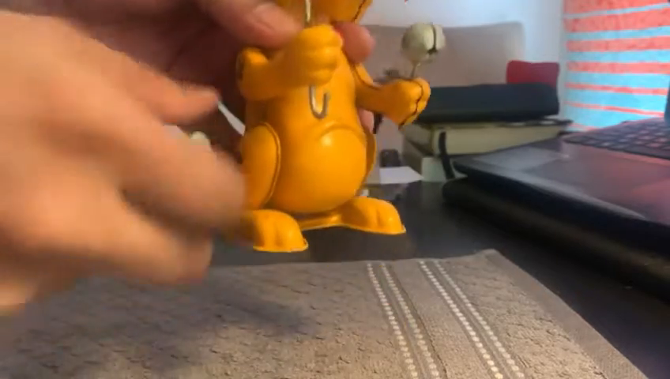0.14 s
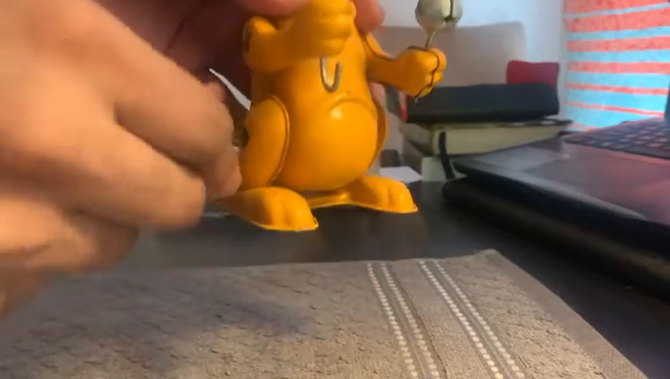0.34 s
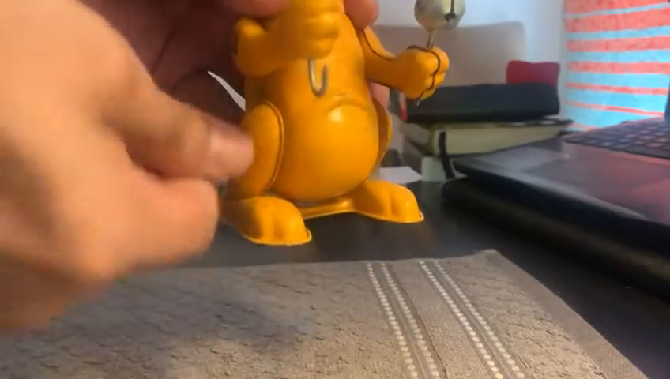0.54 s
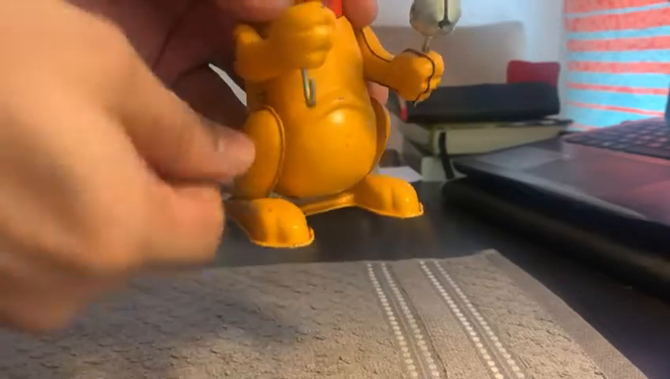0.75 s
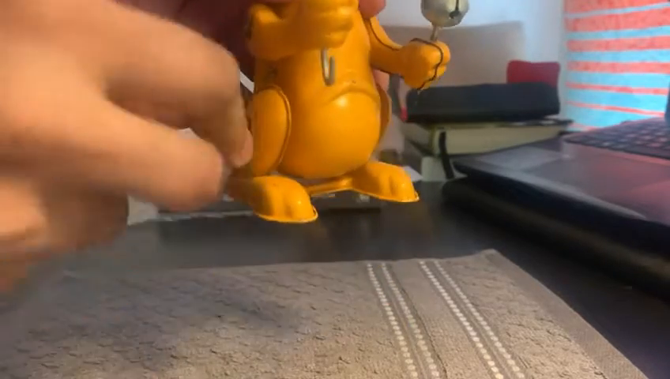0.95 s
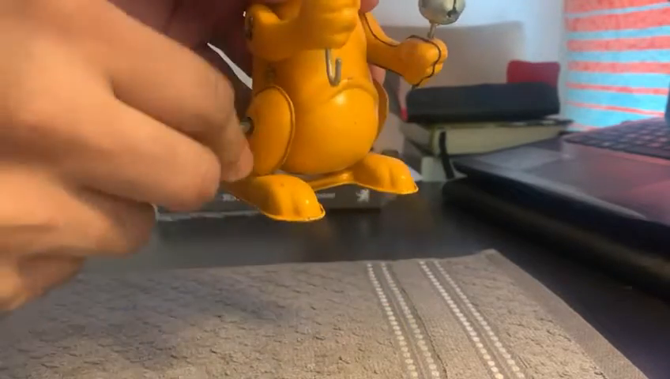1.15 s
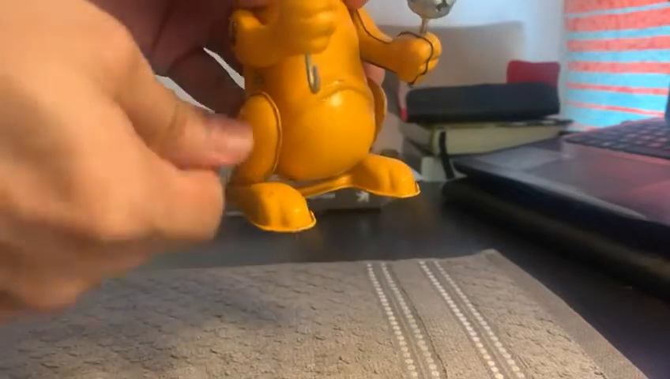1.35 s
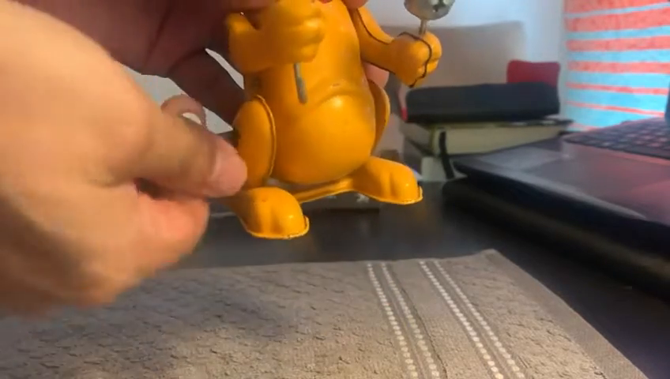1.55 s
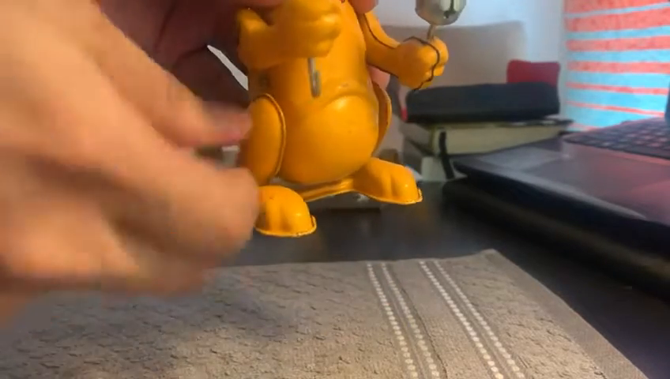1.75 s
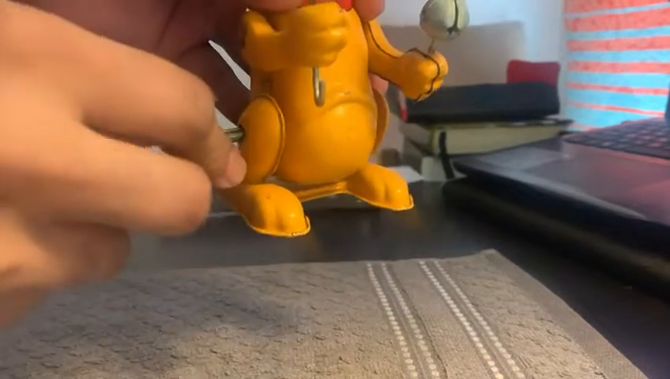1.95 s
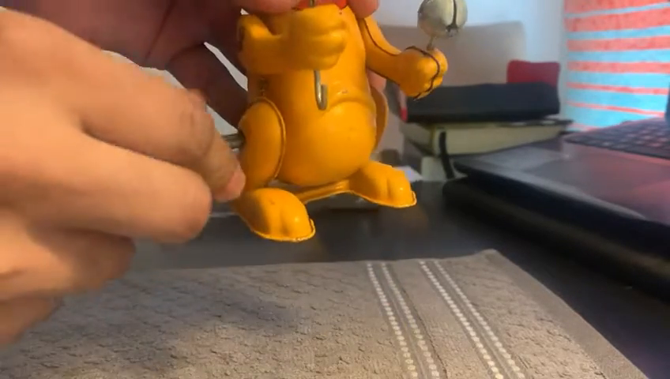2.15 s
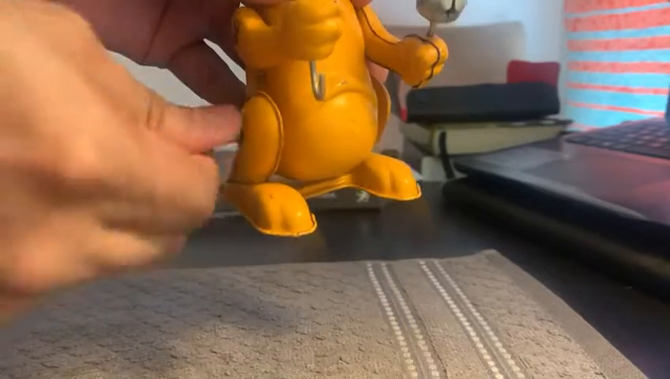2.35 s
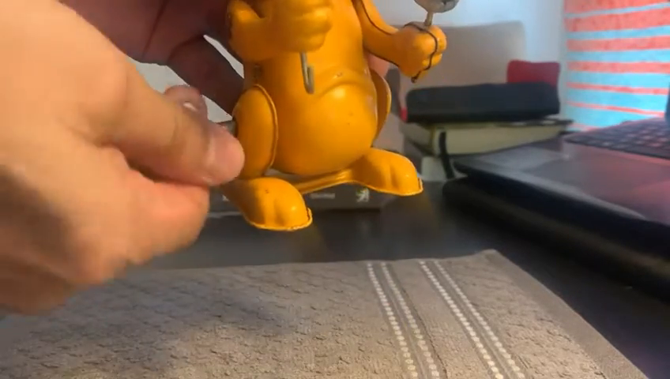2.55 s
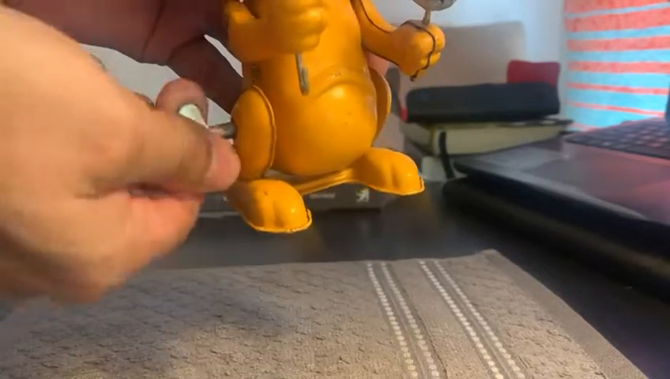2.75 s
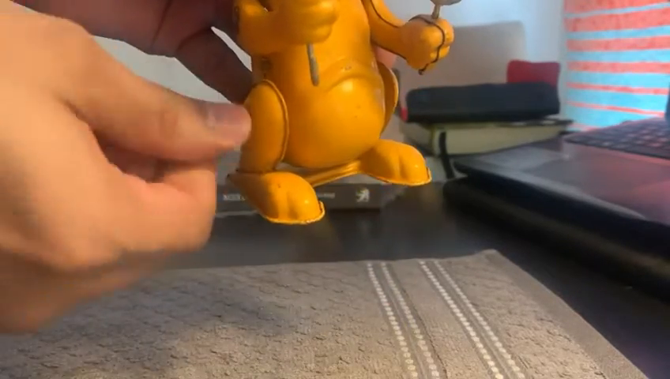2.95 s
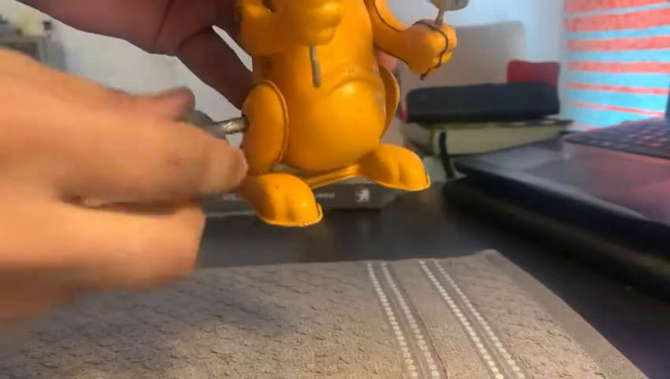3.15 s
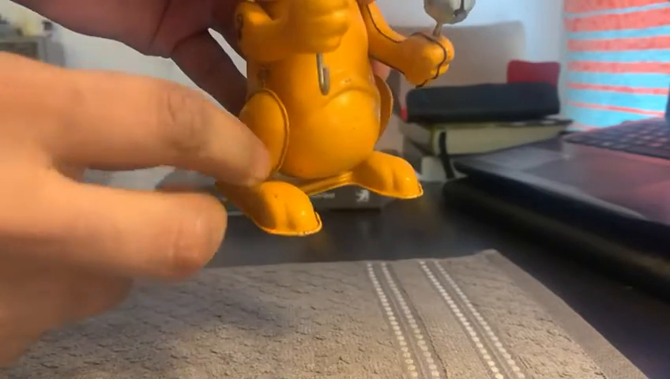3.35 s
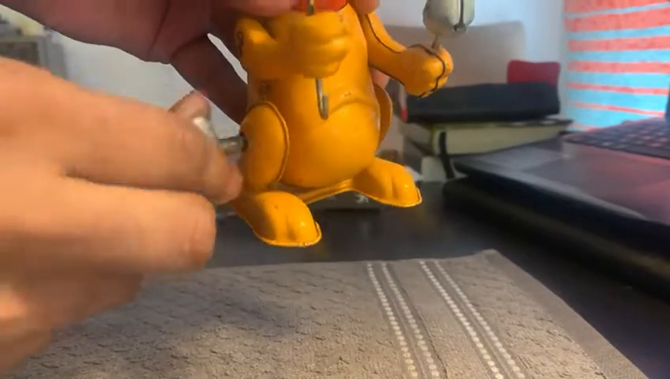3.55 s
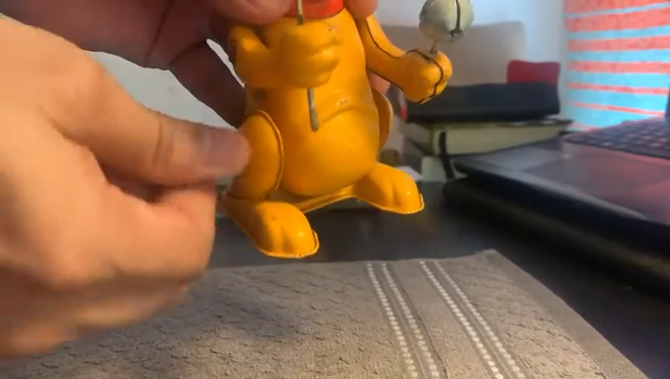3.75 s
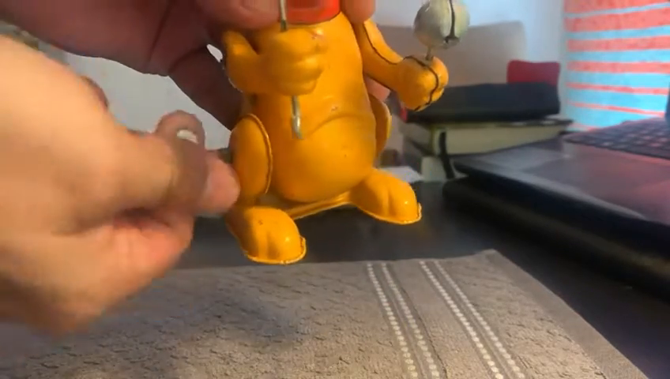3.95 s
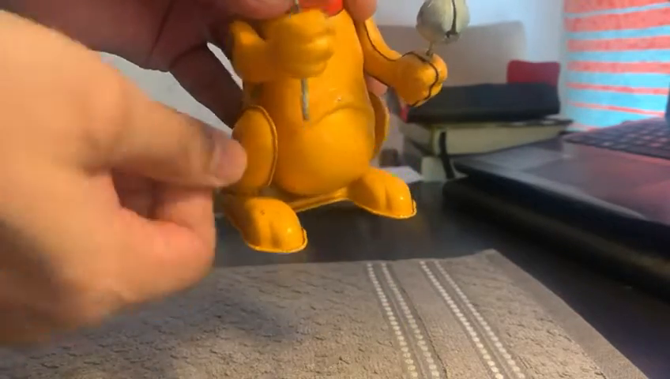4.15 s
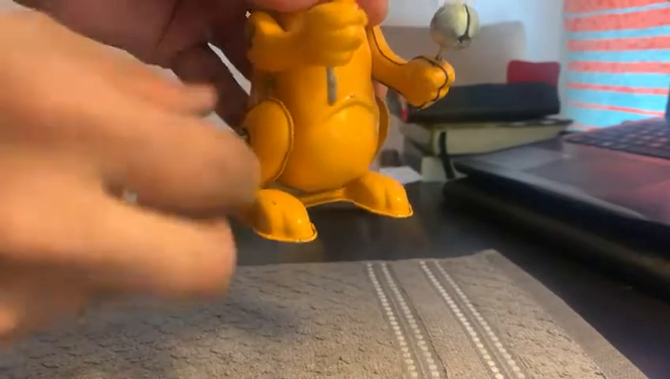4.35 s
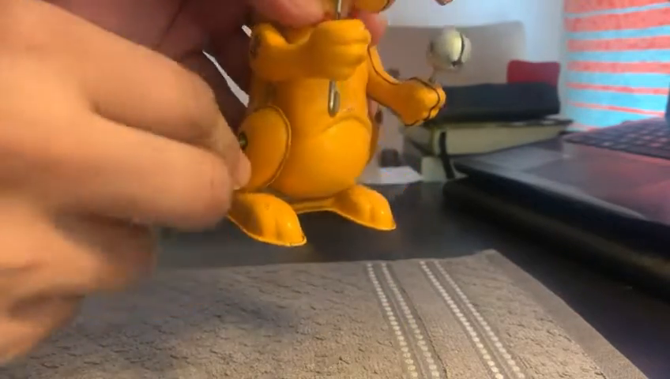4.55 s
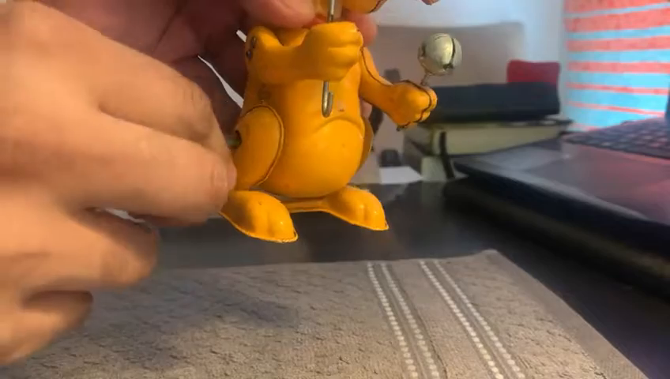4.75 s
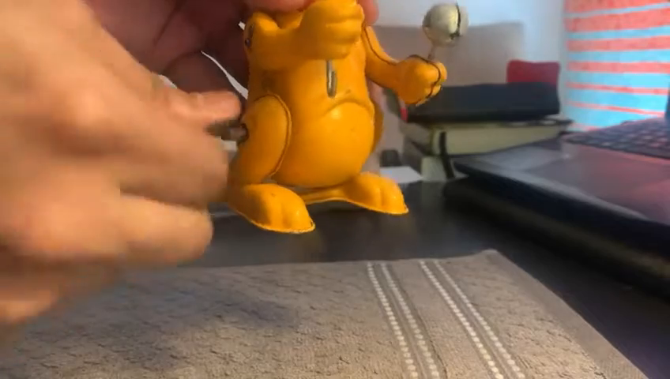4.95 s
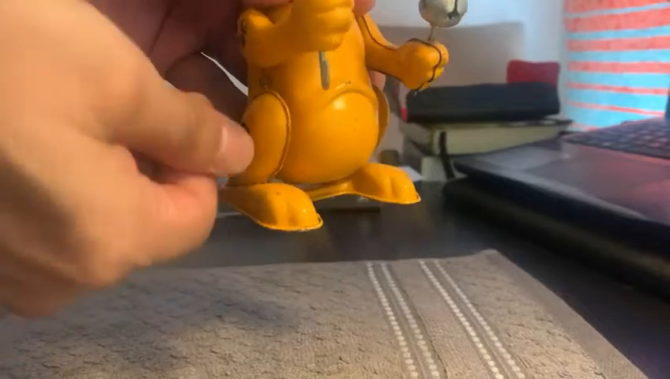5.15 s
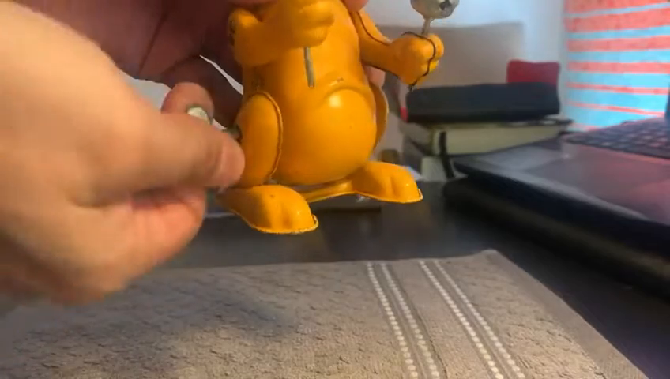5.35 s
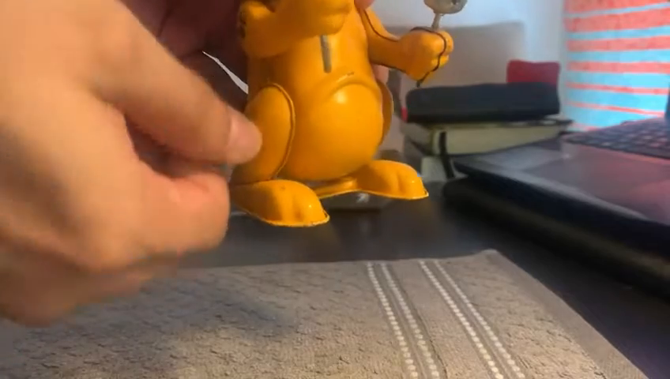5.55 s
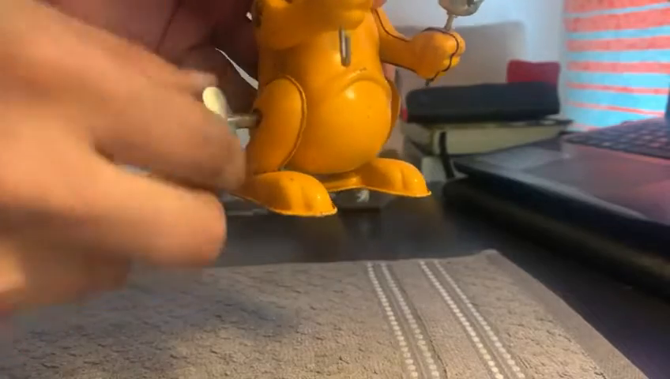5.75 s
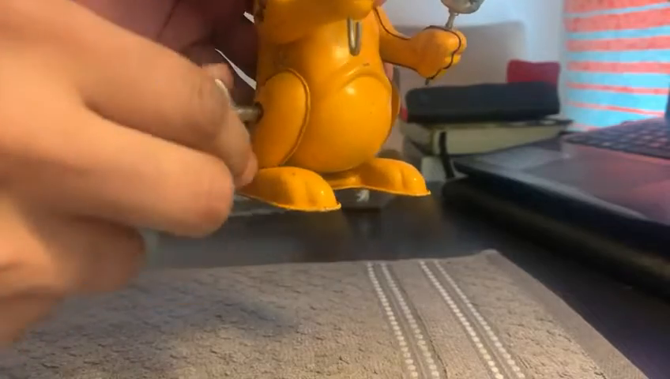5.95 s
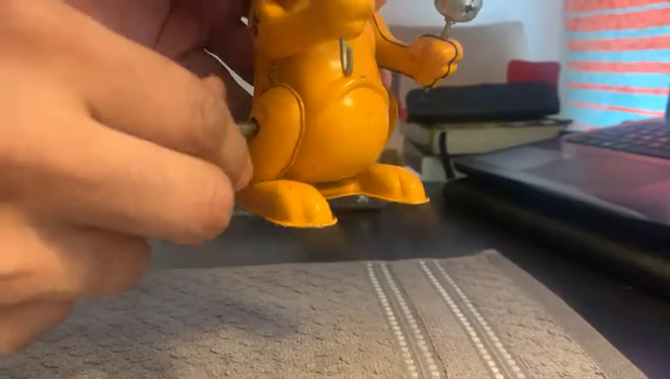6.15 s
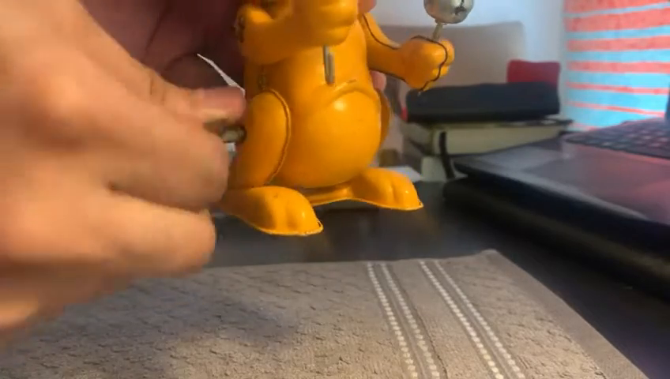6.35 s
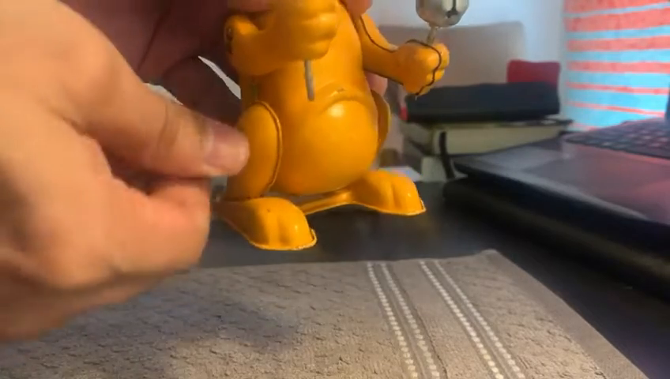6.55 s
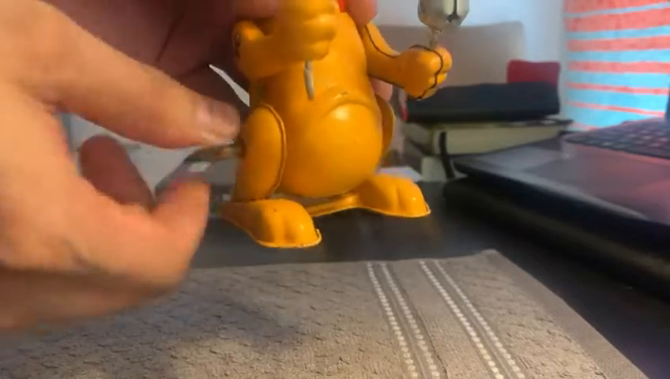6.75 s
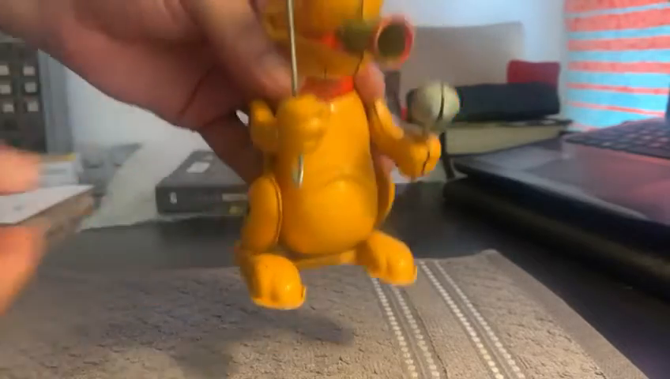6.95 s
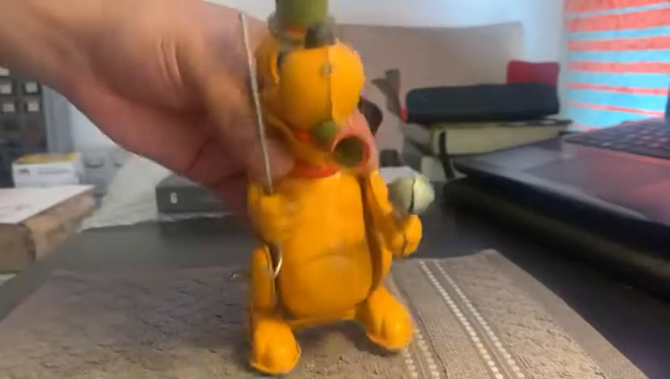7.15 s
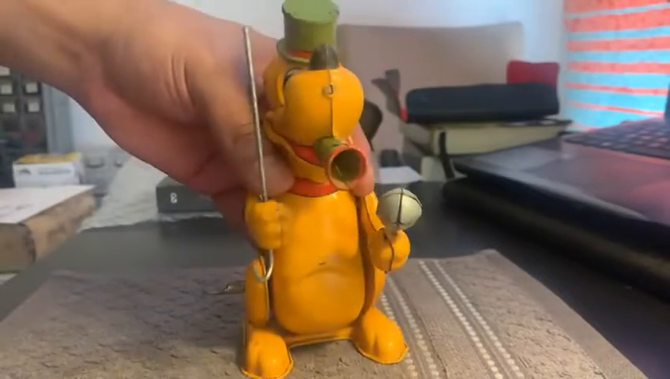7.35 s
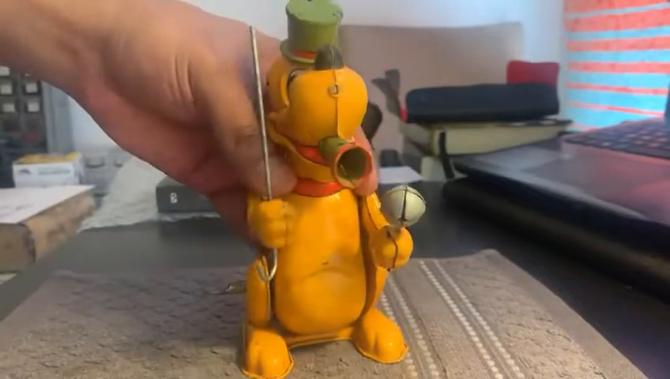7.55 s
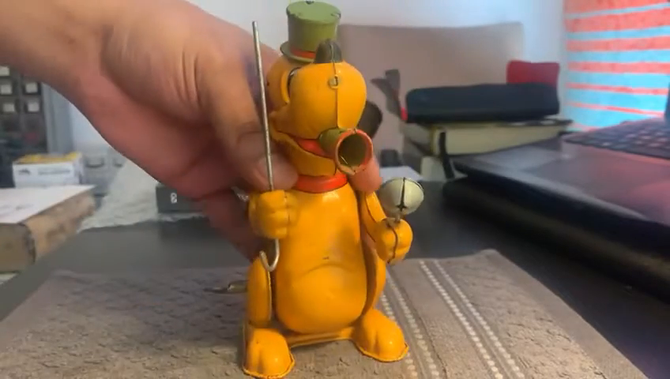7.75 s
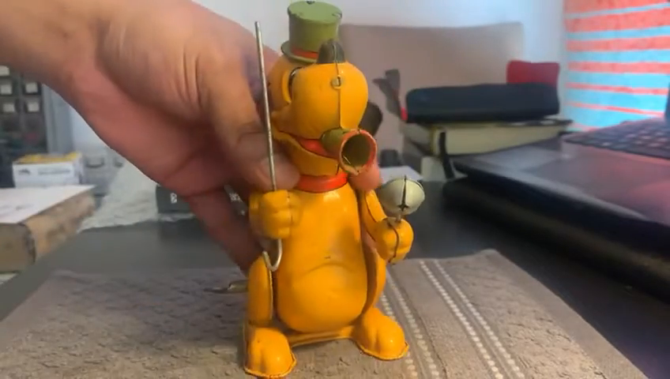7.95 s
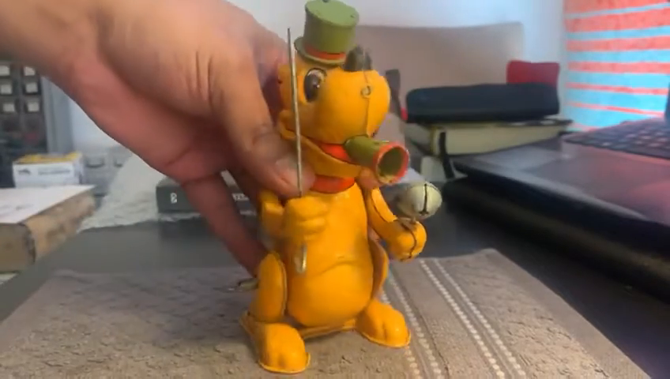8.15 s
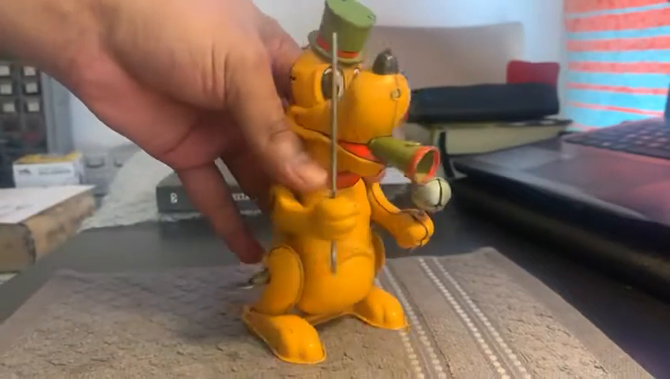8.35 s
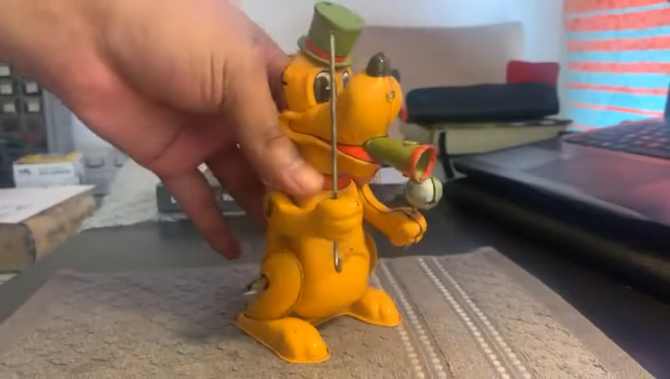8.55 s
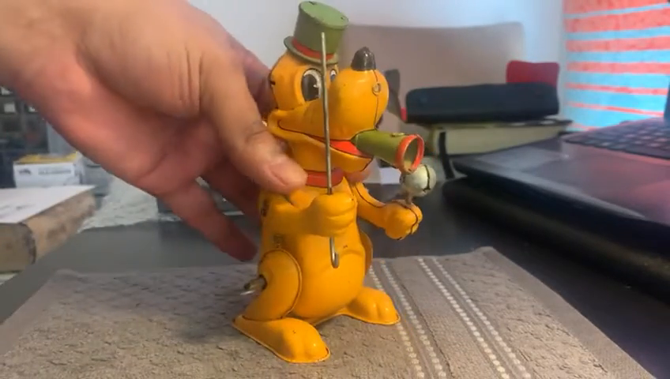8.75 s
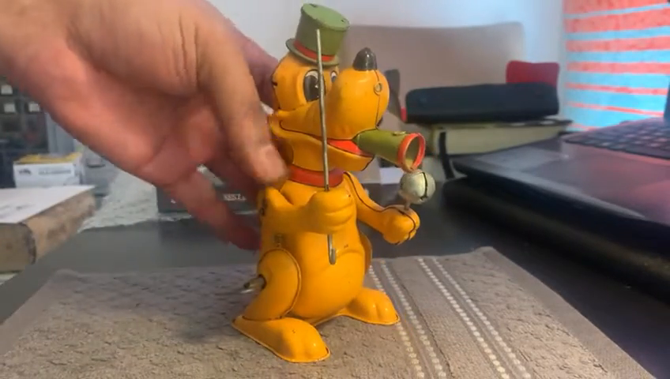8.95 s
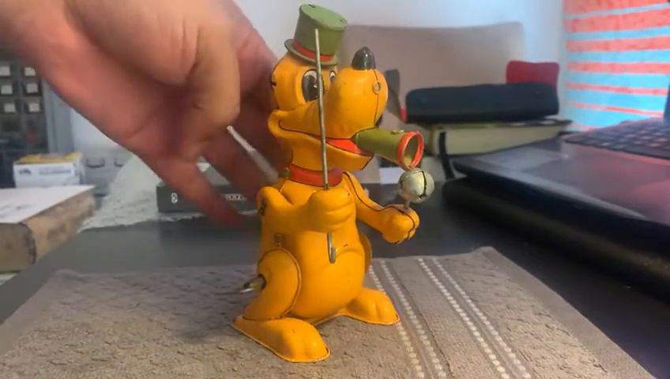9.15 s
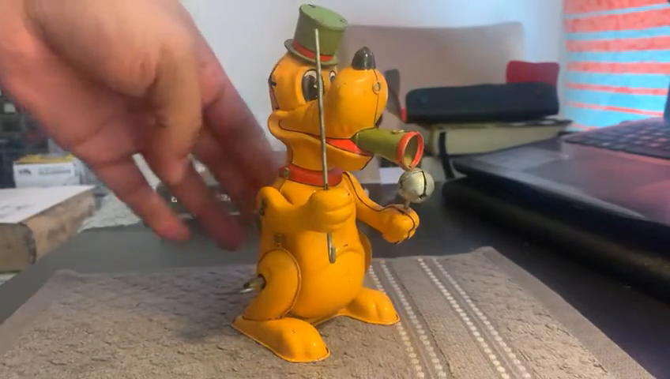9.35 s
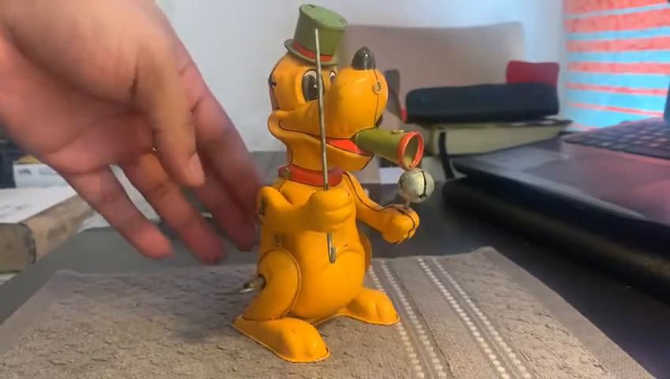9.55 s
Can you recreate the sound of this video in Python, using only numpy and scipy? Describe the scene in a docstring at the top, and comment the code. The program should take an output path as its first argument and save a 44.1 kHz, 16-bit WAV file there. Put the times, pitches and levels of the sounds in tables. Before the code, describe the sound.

Close, crisp key rattles and ratchet snaps in short runs in a quiet humming room, ending with soft cloth scrapes, a thump and a faint bell.

```python
"""Clockwork tin toy

A tin clockwork toy is wound by hand just above a desk, close to two microphones, in a quiet room with a hum.
On each turn the loose key rattles and the pawl drops over the ratchet teeth; the hollow tin shell rings briefly.
Then its feet drag over a cloth mat and, as it is let go, its little bell tinkles.
Hits are noise bursts and decaying modes; rubbing, air and rumble are coloured noise; the hum is sines."""
import sys
import numpy as np
from scipy import signal
from scipy.fft import rfft, irfft, next_fast_len
from scipy.io import wavfile
from scipy.ndimage import map_coordinates

SR = 44100
rng = np.random.default_rng(int(sys.argv[2]) if len(sys.argv) > 2 else 0)


def bounce(signal):
    """Save signal as a 16-bit WAV file at the path given by the first command-line argument."""
    frames = np.transpose(np.atleast_2d(signal))
    limited = np.clip(frames, -1, 1)
    pcm = np.round(limited * 32767).astype(np.int16)
    wavfile.write(sys.argv[1], SR, pcm)


N = 423798  # length [samples]

# Levels in the tables are set before each layer's own trim (the *_db settings).


def amp(db):
    """Decibels to linear gain."""
    return 10 ** (np.asarray(db) / 20)


def unit(x):
    """Scale to rms 1."""
    return x / np.sqrt(np.mean(x ** 2) + 1e-20)


def along(points, hz):
    """Read a curve of (frequency [Hz], value) points on a log frequency axis."""
    f, v = np.transpose(points)
    return np.interp(np.log(hz + 1), np.log(f + 1), v)


def wobble(rate, size=N):
    """A smooth random curve with rate knots a second."""
    knots = rng.standard_normal(int(N * rate / SR) + 4)
    return map_coordinates(knots, [np.arange(size) * rate / SR])


def filtered(x, response):
    """Filter x by a complex response of frequency."""
    size = next_fast_len(N + SR // 2)
    return irfft(rfft(x, size) * response(np.fft.rfftfreq(size, 1 / SR)), size)[..., :N]


def noise(colour):
    """Coloured noise of rms 1."""
    return unit(filtered(rng.standard_normal(N), lambda hz: amp(along(colour, hz))))


def impulse(colour, size=1024):
    """Minimum-phase impulse response with this colour, by folding the cepstrum."""
    cepstrum = irfft(np.log(amp(along(colour, np.fft.rfftfreq(size, 1 / SR)))))
    cepstrum[1:size // 2] *= 2
    cepstrum[size // 2 + 1:] = 0
    return irfft(np.exp(rfft(cepstrum)))


def varied(colour, spread_db):
    """Every contact lands on another spot and so takes a colour of its own."""
    return impulse(colour + rng.standard_normal((len(colour), 1)) * [0, spread_db])


def struck(x):
    """Scale a stereo hit to rms 1 over its first 5 ms."""
    return x / np.sqrt(np.mean(x[:, :SR // 200] ** 2) + 1e-20)


def burst(response, rise, t60, apart):
    """A crowd of short-lived modes: coloured noise that swells and dies, partly different at each port."""
    t = np.arange(SR // 12) / SR
    shape = (1 - np.exp(-t / rise)) * np.exp(-np.log(1000) * t / t60)
    hiss = rng.standard_normal(len(t)) + apart * rng.standard_normal((2, len(t)))
    return struck(signal.fftconvolve(shape * hiss, response[None], axes=1))


def ring(modes, scatter_db, detune):
    """Decaying modes, at new strengths for each blow; grip and loose joints detune them and blur their pitch."""
    t = np.arange(int(SR * max(m[2] for m in modes))) / SR
    hz, db, t60 = np.transpose(modes)[:, :, None]
    size, shift, phase = rng.standard_normal((3, len(modes), 1))
    ports = .6 * rng.standard_normal((2, len(modes), 1))  # phase offset at each port [rad]
    blur = np.cumsum(rng.standard_normal((len(modes), len(t))), axis=1) * detune
    waves = np.sin(2 * np.pi * (hz * (1 + detune * shift) * t + phase + blur) + ports)
    decay = np.exp(-np.log(1000) * t / t60)
    return struck(np.sum(amp(db + scatter_db * size) * decay * waves, axis=1))


def add(track, s, sound):
    """Mix a stereo sound in at time s."""
    part = track[:, max(round(s * SR), 0):][:, :sound.shape[1]]
    part += sound[:, :part.shape[1]]


# colour of the room air: (frequency [Hz], level [dB per Hz])
AIR = [(20, -12.5), (40, 1), (60, 7), (85, -0.5), (130, 0), (250, -3.5), (400, -12.5), (750, -14.5),
       (1100, -22), (2500, -33), (7500, -42.5), (13000, -51.5)]
# left-right likeness of the air: (frequency [Hz], correlation [-1 to 1])
ALIKE = [(125, 0.83), (300, 0.46), (800, 0.03), (3000, 0.03)]
# partials of an appliance hum, before wavering: (frequency [Hz], level [dB])
HUM = [(123.6, -66), (247.2, -69.5), (370.8, -78)]


def background():
    """Wide, low room air and a slightly unsteady hum of sines, a little louder on the right."""
    turn = lambda hz: np.arccos(np.clip(along(ALIKE, hz), -1, 1)) / 2
    mid = filtered(noise(AIR), lambda hz: np.cos(turn(hz)))
    side = filtered(noise(AIR), lambda hz: np.sin(turn(hz)))
    air = amp(-61.0) * np.array([mid + side, mid - side])
    t = np.arange(N) / SR
    hum = np.zeros(N)
    for hz, db in HUM:
        level = amp(db + 2.4 * wobble(8.2)) * np.sqrt(2)
        hum += level * np.sin(2 * np.pi * hz * t + 0.6 * wobble(7))
    return (air + hum) * amp([[-.6], [.6]])


# decay of the room: (frequency [Hz], t60 [s])
ROOM = [(200, 0.71), (1500, 0.2), (3000, 0.23), (7000, 0.19)]


def room(x, count=8):
    """A small room answers with decaying noise tails, a new one per block as the toy moves in the hand."""
    out = np.zeros((2, N + SR))
    block = N // count + 1
    for start in range(0, N, block):
        hz, t, z = signal.stft(rng.standard_normal((2, SR // 2)), SR, nperseg=256)
        decay = np.exp(-np.log(1000) * t / along(ROOM, hz)[:, None])
        tail = signal.istft(z * decay, SR, nperseg=256)[1]
        tail *= 1 - np.exp(-np.arange(tail.shape[1]) / SR / 0.0013)  # soft onset
        tail /= np.linalg.norm(tail[0])
        source = x[:, start:start + block].mean(axis=0, keepdims=True)
        wet = signal.fftconvolve(source, tail, axes=1)
        out[:, start:start + wet.shape[1]] += wet
    colour = [(500, -2.5), (2500, -3.0), (7600, -6.0), (9600, -18.5)]
    return filtered(out[:, :N], lambda hz: amp(along(colour, hz)))


# colour of the hands on the hollow body: (frequency [Hz], level [dB per Hz])
HANDLING = [(90, -10.5), (200, 6.5), (400, -1.5), (780, -7.5), (1200, -42)]
HANDLING_DB, HANDLING_EASE_DB_PER_S = -66, 2.7  # starting level of the rumble and its steady fall


def handling():
    """A low, wavering rumble of the hands shifting on the toy, ever gentler."""
    rumble = unit(noise(HANDLING) * amp(4 * wobble(9)))
    return amp(HANDLING_DB - HANDLING_EASE_DB_PER_S * np.arange(N) / SR) * rumble


def slides(table, colour, catch_db):
    """Each slide swells and fades with a colour of its own, catching and slipping in fine grains."""
    out = np.zeros((2, N))
    for s, length, db in table:
        n = int(length * SR)
        catching = amp(2 * wobble(300, n) + catch_db * wobble(35, n))
        grains = rng.standard_normal(n) * catching
        rub = unit(signal.fftconvolve(grains, varied(colour, spread_db=2))[:n])
        add(out, s, amp(db) * np.hanning(n) * np.array([rub, rub]))
    return out


# the feet slide over the mat: (start [s], length [s], level [dB])
PUSHES = [(8.0, 0.31, -72), (8.23, 0.31, -67.5)]
# colour of the feet dragging on cloth: (frequency [Hz], level [dB per Hz])
CLOTH = [(300, -4), (1100, -3), (3500, -5.5), (7400, -3.5), (8800, -14.5)]
# resonances of the body as its feet drag: (frequency [Hz], width [Hz], level [dB])
DRAG = [(2490, 39, 10), (3280, 57, 18), (4890, 230, 4)]


def dragging_feet():
    """Tin feet drag on cloth: grainy noise, coloured by band-pass resonances of the body."""
    def body(f):
        gain = 1
        for hz, width, db in DRAG:
            gain = gain + amp(db) * 1j * f * width / (hz * hz - f * f + 1j * f * width)
        return gain
    return filtered(slides(PUSHES, CLOTH, catch_db=4.5), body)


# the feet settle on the mat: (time [s], level [dB])
FEET = [(7.725, -61), (8.926, -48.5), (8.944, -58)]
# colour of the desk beneath: (frequency [Hz], level [dB per Hz])
DESK = [(30, -10), (60, 13.5), (130, -1), (400, -8.5), (1600, -16), (6000, -45)]


def foot_thumps():
    """The feet thump softly on the desk: slow-rising dull bursts."""
    out, desk = np.zeros((2, N)), impulse(DESK)
    for s, db in FEET:
        add(out, s, amp(db) * burst(desk, rise=0.0032, t60=0.084, apart=0.25))
    return out


# the pellet strikes the bell: (time [s], level [dB])
PELLET = [(8.928, -52.5), (8.945, -55.5), (8.981, -55)]
# modes of the bell: (frequency [Hz], level [dB], t60 [s])
BELL = [(6530, -2, 0.076), (7140, -8, 0.18), (11800, 2, 0.12), (11900, -3, 0.13)]


def bell():
    """The bell in the toy's hand tinkles as the fingers let go: quick strikes on high decaying modes."""
    out = np.zeros((2, N))
    for s, db in PELLET:
        add(out, s, amp(db) * ring(BELL, scatter_db=2, detune=.01))
    return out


# strokes of the fingers on the key: (start [s], length [s], scrape level [dB], chatter level [dB])
TURNS = [(0, 0.096, -55, -55), (0.437, 0.19, -57, -49.5), (0.775, 0.15, -55, -49.5),
         (1.227, .17, -55.5, -48), (2.25, 0.29, -57, -51.5), (2.93, 0.095, -61, -61),
         (3.649, .25, -59, -53.5), (4.79, .34, -61, -55), (6.33, 0.18, -66, -58)]
ATTACK_S, RELEASE_DB_PER_S = 0.066, 170  # a stroke takes hold, then eases off
GRIP_DB, GRIP_END_S = -77, 6.7  # light rubbing between strokes, until the toy is stood on the mat


def effort():
    """How hard the fingers work the key [dB]: each stroke rises, holds and eases back to a light grip."""
    t = np.arange(N) / SR
    held = lambda end: amp(-RELEASE_DB_PER_S * np.maximum(t - end, 0))
    total = amp(GRIP_DB) * held(GRIP_END_S)
    for s, length, db, _ in TURNS:
        total += amp(db) * np.clip((t - s) / ATTACK_S, 0, 1) * held(s + length)
    return 20 * np.log10(total + 1e-9)


# the fingers slide round the key to a new grip: (start [s], length [s], level [dB])
RUBS = [(.15, 0.85, -62.5), (1.95, 0.51, -63.5), (3.25, 0.51, -66)]
# colour of scraping and rubbing: (frequency [Hz], level [dB per Hz])
SCRAPE_COLOUR = [(200, -20), (750, -4), (2700, 5), (3500, -10.5), (7500, -16), (9500, -40.5)]


def finger_rubs():
    """Fingers slide on the key, catching and slipping strongly."""
    return slides(RUBS, SCRAPE_COLOUR, catch_db=12.5)


def scraping():
    """Gritty scraping of the winding: uneven coloured noise that follows the effort."""
    grit = unit(noise(SCRAPE_COLOUR) * amp(5.5 * wobble(160)))
    return amp(effort() - 1.0) * grit


# the fingers find the key again between strokes: (time [s], level [dB])
TOUCHES = [(1.664, -40), (1.862, -52.5), (1.973, -49), (2.8913, -46), (3.023, -42), (3.048, -45),
           (3.108, -48.5), (3.3423, -50), (5.672, -48.5), (5.8181, -56.5), (6.498, -53.5), (6.697, -45.5)]
# modes of the lightly touched key: (frequency [Hz], level [dB], t60 [s])
TICK = [(2130, -5.5, 0.035), (2674, 2, .05)]


def touches(touch_db=-7):
    """A fingertip brushes the key: a soft tick with a brief pitch."""
    out = np.zeros((2, N))
    for s, db in TOUCHES:
        add(out, s, amp(db + touch_db) * ring(TICK, scatter_db=3, detune=.015))
    return out


TICK_DB, TICK_CROWDING = -3, .55  # faintest tick against the effort; dB of tick rate per dB of effort


def ticks(count=190):
    """Light ticks of the key, denser and stronger the harder it is worked."""
    out, effort_db = np.zeros((2, N)), effort()
    crowding = np.cumsum(amp(TICK_CROWDING * effort_db))
    for place, size in rng.random((count, 2)):
        at = np.searchsorted(crowding, place * crowding[-1])
        db = effort_db[at] + TICK_DB + 10 * size ** 2
        add(out, at / SR, amp(db) * ring(TICK, scatter_db=5, detune=.03))
    return out


# the works slam across their play and jolt the whole body: (time [s], shell level [dB], snap level [dB],
# panel pitch [Hz], hollow level [dB], lead-in [s], first catch [dB re blow], rebound [dB re blow])
CLUNKS = [(0.834, -28, -20.5, 1830, -42.5, 0.018, -6, -17),
          (2.308, -32.5, -29, 3000, -46, 0.0079, -22, -25.5),
          (2.973, -26, -24.5, 2828, -45.5, 0.035, -2.5, -8),
          (3.687, -31.5, -38, 2023, -50, .025, -22, -3.5),
          (4.198, -24.5, -18, 2950, -51.5, 0.016, -21, -10),
          (6.744, -35.5, -37, 1907, -48, 0.048, 7.5, -27), (7.271, -33, -34, 2283, -73, 0.025, -29, -29)]
BOUNCE_S, LEAD_IN_DB = 0.0068, -22.5  # gap between the contacts of a clunk; first touch against the blow


def clunks():
    """A clunk is a light touch, a first catch, the blow and a rebound: (time [s], shell [dB], snap [dB])."""
    rows = []
    for s, shell, snap, _, _, lead, catch, rebound in CLUNKS:
        for delay, db in [(-lead, LEAD_IN_DB), (-BOUNCE_S, catch), (0, 0), (BOUNCE_S, rebound)]:
            rows.append((s + delay, shell + db, snap + db))
    return rows


# colour of the hollow body: (frequency [Hz], level [dB per Hz])
HOLLOW = [(60, -14), (300, 1), (550, -10), (850, -0.5), (3000, -37.5)]


def hollow_body(pawl_db=-24):
    """Clunks, and faintly the pawl, sound the hollow of the body as low bursts."""
    out, hollow = np.zeros((2, N)), impulse(HOLLOW)
    shakes = [(s - BOUNCE_S / 2, db) for s, _, _, _, db, *_ in CLUNKS]
    shakes += [(s, db + pawl_db) for s, db, *_ in PAWL]
    for s, db in shakes:
        add(out, s, amp(db) * burst(hollow, rise=0.00055, t60=0.071, apart=1.0))
    return out


# the mainspring sings on after a clunk: (frequency [Hz], level [dB], t60 [s])
SPRING = [(3350, -1, 0.14), (3500, 2, .1), (4200, 3.5, 0.14), (5400, -2, .17), (6700, -7, 0.4)]


def after_ring(spring_db=-17, belly_db=-17):
    """The belly rings on after the teeth, each at its own level; a clunk also sets the mainspring ringing."""
    out = np.zeros((2, N))
    belly = TIN[:2]
    for s, *_, db in PAWL:
        add(out, s, amp(db) * ring(belly, scatter_db=2, detune=.003))
    for s, db, *_ in CLUNKS:
        add(out, s, amp(db + belly_db) * ring(belly, scatter_db=3, detune=.003))
        add(out, s, amp(db + spring_db) * ring(SPRING, scatter_db=4, detune=.008))
    return out


RATTLE_S, RATTLE_DB, RATTLE_FALL_DB = 0.061, -23, 25  # length, first level against the blow, fall
CHATTER_SNAP_DB, CHATTER_SPREAD_DB = -7, 3  # chatter is duller than a click, and uneven


def chatter(count=11):
    """Tiny contacts at uneven gaps: the key through each stroke, loose parts after each clunk."""
    out, rows, snap = np.zeros((2, N)), [], impulse(SNAP)
    uneven = lambda: (np.arange(count) + rng.random(count)) / count
    for start, length, _, db in TURNS:
        rows += [(start + length * u, db) for u in uneven()]
    for s, db, *_ in CLUNKS:
        for u in uneven():
            rows.append((s + BOUNCE_S + RATTLE_S * u, db + RATTLE_DB - RATTLE_FALL_DB * u))
    for s, db in rows:
        shell = varied(SHELL, spread_db=6)
        for response, part_db in (shell, db), (snap, db + CHATTER_SNAP_DB):
            size = amp(part_db + CHATTER_SPREAD_DB * rng.standard_normal())
            add(out, s, size * burst(response, rise=.0006, t60=.014, apart=.4))
    return out


def panel(hz, skirt_db):
    """Impulse response of one small tin panel: a single broad peak at its pitch."""
    return impulse([(hz / 2.5, -skirt_db), (hz, 0), (hz * 1.4, -skirt_db / 2), (hz * 5, -1.5 * skirt_db)])


# the key shaft knocks dully on a tin panel: (time [s], level [dB], pitch [Hz])
KNOCKS = [(.461, -37.5, 2740), (.507, -33.5, 2050), (.524, -32.5, 2600), (0.907, -35, 2190),
          (0.983, -44.5, 2600), (1.285, -30.5, 2280), (1.291, -28, 2480), (2.26, -38.5, 2640),
          (2.323, -34, 2560), (2.345, -44, 2640), (2.431, -40.5, 2570), (3.074, -43.5, 2570),
          (3.492, -46, 2580), (3.711, -39, 2310), (5.258, -42, 2520), (6.796, -41.5, 2600)]


def knocks(pawl_db=-4, clunk_db=-5, skirt_db=32):
    """Each blow lands on one small tin panel, which gives a short rough clack at its pitch."""
    out = np.zeros((2, N))
    blows = KNOCKS + [(s, db + pawl_db, hz) for s, db, _, hz, _ in PAWL]
    blows += [(s, db + clunk_db, hz) for s, db, _, hz, *_ in CLUNKS]
    for s, db, hz in blows:
        add(out, s, amp(db) * burst(panel(hz, skirt_db), rise=0.00088, t60=.026, apart=.4))
    return out


# colour of the shell's clack: (frequency [Hz], level [dB per Hz])
SHELL = [(100, -23), (450, -14.5), (1000, -7), (1400, -6), (2100, 1.5), (2800, -3), (3500, 2), (4300, -8),
         (5600, -10.5), (8000, -14), (13000, -43.5)]
# colour of the bright snap: (frequency [Hz], level [dB per Hz])
SNAP = [(500, -27.5), (3500, -4.5), (5600, -4), (6800, 4), (8100, 1), (8950, -3.5), (9500, -4.5),
        (10000, 5.5), (11400, 2), (12100, -12.5), (13000, -23.5)]
# modes of the tin shell, the two of the belly first: (frequency [Hz], level [dB], t60 [s])
TIN = [(1302.5, -1.5, 0.12), (2043, 1, 0.13), (2634, 10, 0.055)]
# modes of the key and works: (frequency [Hz], level [dB], t60 [s])
STEEL = [(5300, 0.5, 0.051), (8000, 8, 0.048), (8440, -5, 0.04), (11010, -2, 0.046)]


def contacts(table, rise, shell_t60, snap_t60, shell_db, snap_db, tin_db, steel_db, slip_db, blur):
    """Steel on steel: a short swelling slip, a bright snap, the clack of the shell and their after-ring."""
    out = np.zeros((2, N))
    for s, body_db, edge_db, *_ in table:
        shell, snap = varied(SHELL, spread_db=2.5), varied(SNAP, spread_db=2.5)
        slip = burst(shell, rise, t60=.04, apart=.4)[:, ::-1]  # reversed, so it swells into the hit
        add(out, s + rise - slip.shape[1] / SR, amp(body_db + slip_db) * slip)
        add(out, s - rise / 2, amp(edge_db + snap_db) * burst(snap, rise, snap_t60, apart=0.028))
        add(out, s, amp(body_db + shell_db) * burst(shell, rise, shell_t60, apart=0.82))
        add(out, s, amp(body_db + tin_db) * ring(TIN, scatter_db=4, detune=blur))
        add(out, s, amp(edge_db + steel_db) * ring(STEEL, scatter_db=5, detune=.005))
    return out


# sharp clicks of the loose key and linkage: (time [s], shell level [dB], snap level [dB])
KEY = [(.461, -33, -45), (.507, -44.5, -39.5), (.535, -32.5, -31), (.636, -42, -39), (.79, -39, -38.5),
       (1.161, -42, -52), (1.184, -38.5, -37), (1.242, -37, -43), (1.259, -41.5, -40),
       (1.278, -32.5, -28.5), (1.303, -34, -40.5), (1.325, -30, -36), (1.339, -34, -29.5),
       (1.355, -33, -40), (1.405, -38, -33.5), (1.726, -34, -42.5), (1.918, -42, -46.5),
       (2.213, -44.5, -41.5), (2.276, -33, -42), (2.297, -34.5, -42.5), (3.662, -37, -43), (3.73, -37, -44),
       (3.843, -36.5, -39.5), (4.128, -43, -57), (4.139, -42.5, -52), (4.805, -34, -34.5),
       (4.839, -38.5, -40), (8.69, -60, -80), (8.775, -64.5, -72), (8.927, -48, -54)]


def key():
    """The key clicks in its socket as the fingers turn it and take a new grip; the clunks hit the same way."""
    return contacts(KEY + clunks(), rise=0.0011, shell_t60=0.013, snap_t60=0.02, shell_db=-4.5,
                    snap_db=-2.5, tin_db=-7.5, steel_db=-15.0, slip_db=-11.5, blur=.016)


# the pawl drops off a tooth: (time [s], shell level [dB], snap level [dB],
# pitch of the panel it knocks [Hz], ring of the belly [dB])
PAWL = [(0.077, -32.5, -26, 2270, -56), (0.605, -34.5, -33, 2140, -41.5), (0.665, -33.5, -25.5, 1880, -51),
        (1.415, -31, -21, 3220, -50), (1.502, -33, -33, 2500, -46.5), (1.709, -36, -33, 2690, -52.5),
        (2.399, -32.5, -30.5, 2550, -49), (2.489, -36.5, -28.5, 2150, -39.5),
        (2.606, -31.5, -27, 2715, -49.5), (3.578, -35.5, -33.5, 1880, -51), (3.769, -34, -24, 1880, -50.5),
        (3.862, -33.5, -24, 2440, -53), (3.972, -32.5, -32.5, 2780, -51.5), (4.326, -38, -38.5, 2740, -52),
        (4.918, -33.5, -29, 3000, -63), (5.015, -32.5, -29.5, 2700, -53), (5.107, -35, -33.5, 2140, -41.5),
        (5.205, -36, -27.5, 2910, -52), (5.366, -32.5, -35.5, 2300, -51.5), (5.519, -39, -33, 2200, -61),
        (6.247, -38.5, -31, 3425, -54), (6.388, -32.5, -27.5, 1930, -51), (6.515, -33.5, -23.5, 3060, -56)]


def ratchet():
    """The sprung pawl snaps crisply onto each tooth."""
    return contacts(PAWL, rise=0.00062, shell_t60=0.018, snap_t60=0.019, shell_db=-4.5,
                    snap_db=-4.0, tin_db=-9, steel_db=-17.5, slip_db=-17.5, blur=0.011)


# how far the left port leads the right: (frequency [Hz], phase [rad])
LEAD = [(200, -4), (1300, 1.5), (2000, -2), (2600, -1.7), (3500, -3), (4200, -5), (8600, -4.5),
        (12600, -0.5)]


def scene():
    """The toy reaches the two microphone ports out of step; the room surrounds it."""
    toy = dragging_feet() + foot_thumps() + bell() + finger_rubs() + scraping() + touches() + ticks()
    toy += hollow_body() + after_ring() + chatter() + knocks() + key() + ratchet()
    half_each = np.array([[.5], [-.5]])  # split the lead between left and right
    direct = filtered(toy, lambda hz: np.exp(1j * along(LEAD, hz) * half_each))
    return background() + amp(-7.0) * room(toy) + handling() + direct


TOP_HZ = 12600  # upper band limit


def record(dry):
    """A very steep low-pass removes the treble above the band limit."""
    return filtered(dry, lambda hz: 1 / np.sqrt(1 + (hz / TOP_HZ) ** 120))


dry = scene()
out = record(dry)
bounce(out)
```